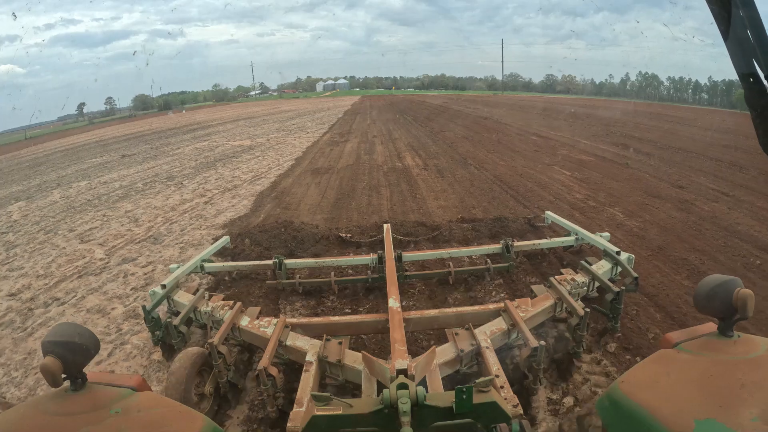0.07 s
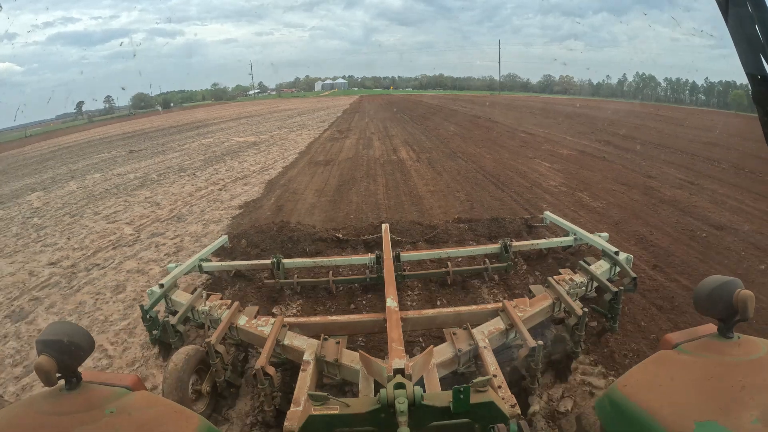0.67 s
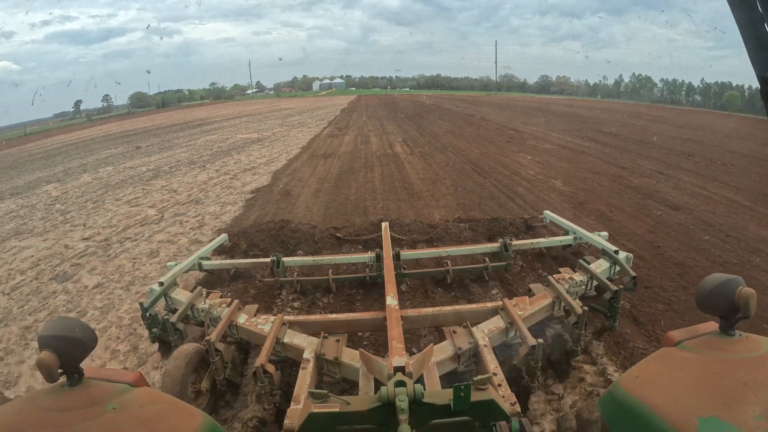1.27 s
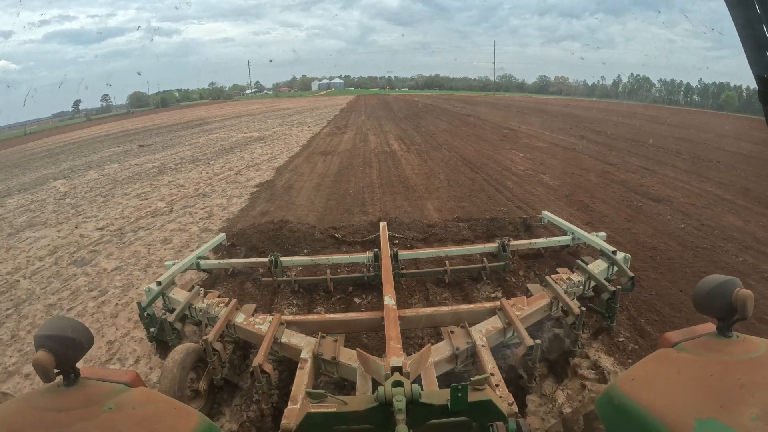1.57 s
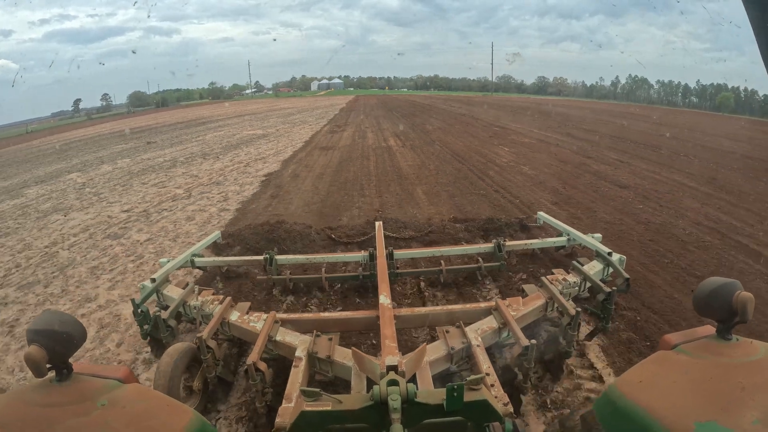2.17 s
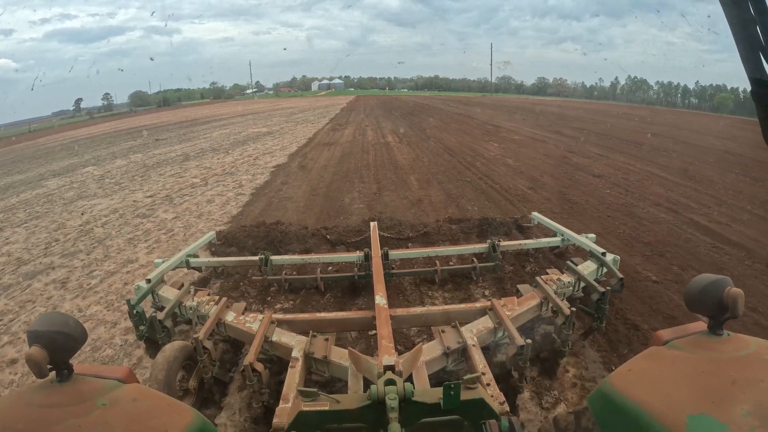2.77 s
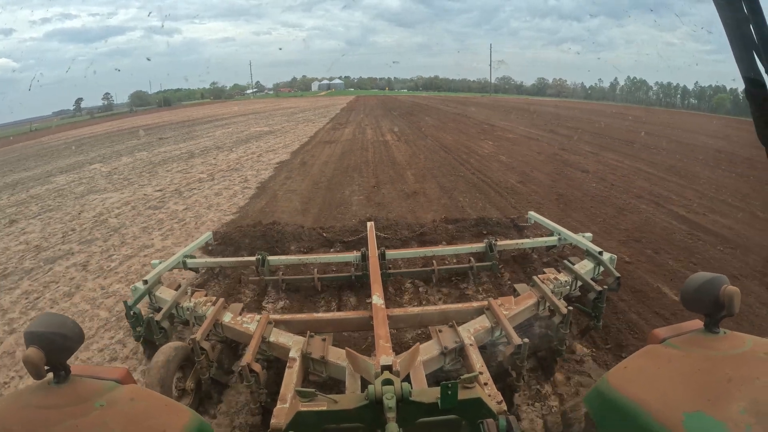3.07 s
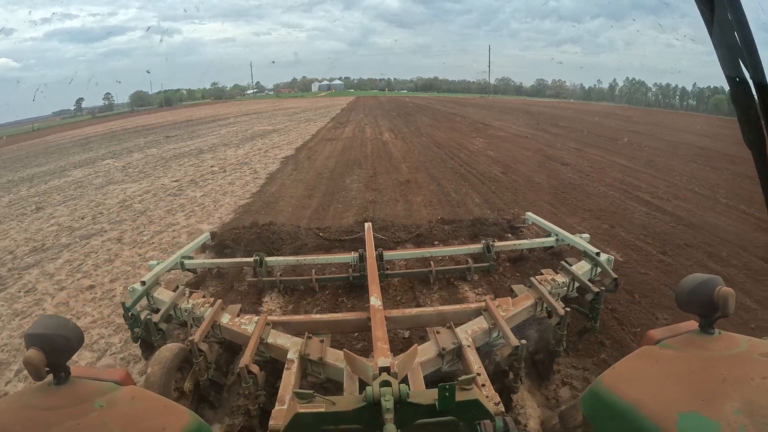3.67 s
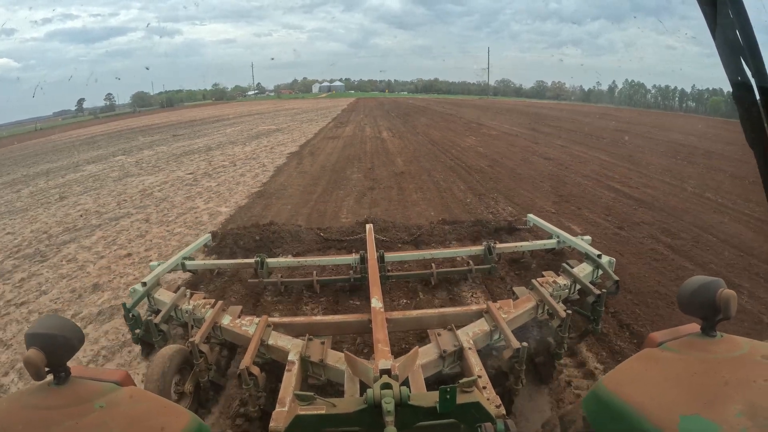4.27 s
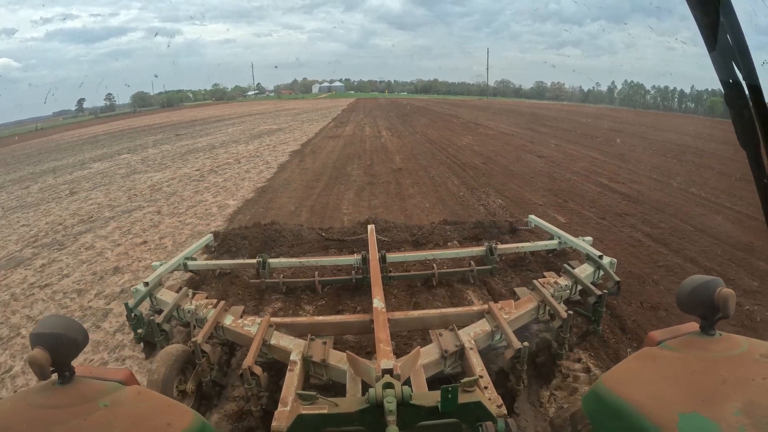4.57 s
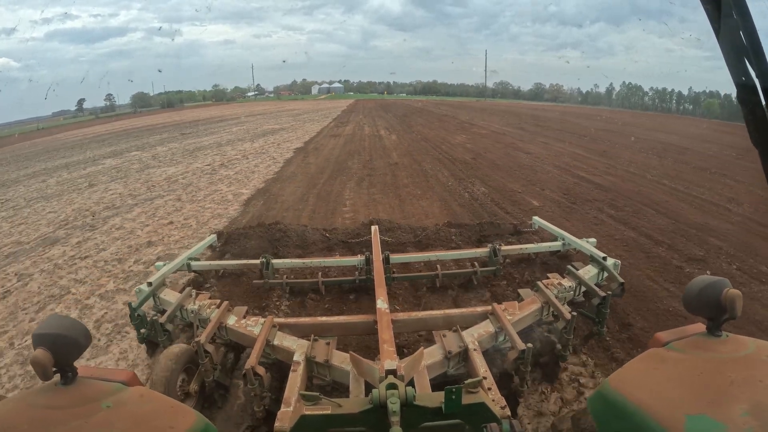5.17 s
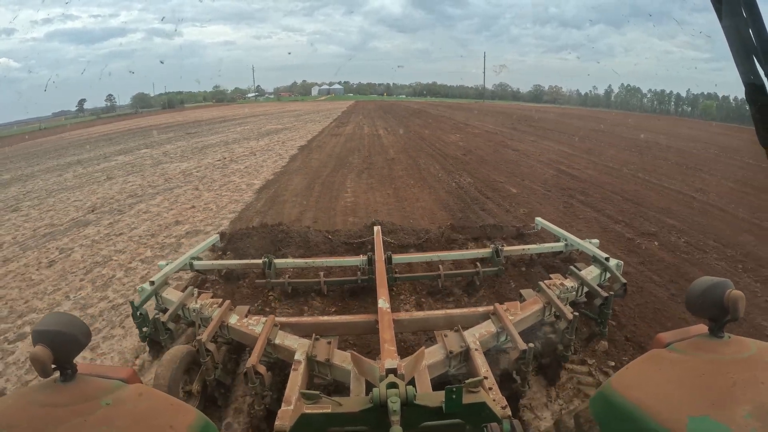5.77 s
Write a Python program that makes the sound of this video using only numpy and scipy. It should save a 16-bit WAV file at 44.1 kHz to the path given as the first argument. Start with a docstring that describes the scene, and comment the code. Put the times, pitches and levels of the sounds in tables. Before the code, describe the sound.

Inside a closed tractor cab, a laboring diesel engine hums and booms while gears whine and a ripper scrapes through soil.

```python
"""The hum, clatter and drone of a six-cylinder diesel tractor ripping a field, heard inside the closed cab.
The engine's tones and knocks follow its speed as the load bends it; the transmission drones and gears whine.
The cab booms, shakes and rattles, and the ripper's steel scrapes and squeals through hard ground.
Near the end the sound fades out for an instant and comes back a little thinner and brighter."""
import sys
import numpy as np
from scipy import signal
from scipy.fft import rfft, irfft, next_fast_len
from scipy.io import wavfile
from scipy.ndimage import uniform_filter1d

SR = 44100
rng = np.random.default_rng(int(sys.argv[2]) if len(sys.argv) > 2 else 0)


def wav_out(sig):
    """Save sig, one row per channel (or a flat mono array), as 16-bit PCM at SR to the path in sys.argv[1]."""
    wavfile.write(sys.argv[1], SR, np.round(np.clip(np.atleast_2d(sig).T, -1, 1) * 32767).astype(np.int16))


N = 265041
TIME = np.arange(N) / SR

# each cylinder's knock, in firing order: level/dB
CYLINDERS = [-2.5, 4.5, 3, 0.5, 0.5, 0.5]
# colour shared by the rush of air and the loose fittings: f/Hz, level/dB
RUSH_COLOUR = [(500, -8), (1000, -3), (1370, 0.5), (1600, -6.5), (1850, -2.5), (2060, 0), (2400, -3),
               (2700, -6.5), (3000, -10.5), (3420, -11), (3560, -10.5), (3720, -15.5), (4000, -16),
               (5500, -22.5), (7200, -25), (8100, -40), (10200, -43.5), (11200, -61), (14000, -56.5)]


def engine_hum(turns, speed, pull_db):
    """The unevenly throbbing firing note and the other low orders (multiples) of the engine cycle."""
    # the firing note swells and sinks: t/s, level/dB
    firing_levels = [(0, -31.5), (1.2, -28.5), (1.42, -24), (2.3, -25), (2.65, -30.5), (3.45, -25),
                     (4.1, -30), (4.6, -28), (5.3, -38), (5.85, -28), (5.93, -23)]
    # the next order up wells up and beats against it: t/s, half-length/s, level/dB
    beats = [(2.4, 0.64, -31), (3.25, 0.36, -32.5)]
    # the body of the hum at the usual pull: order, level/dB
    orders = [(3, -33), (4, -41.5), (5, -38.5), (7, -35), (8, -44), (9, -39), (10, -41), (11, -39.5),
              (12, -36), (13, -44), (14, -44), (15, -47), (16, -48.5), (17, -48), (18, -49.5), (20, -45.5),
              (23, -45.5), (24, -52), (27, -53), (31, -56.5), (36, -56.5), (41, -58.5), (51, -60)]
    # orders that sweep through the cab's panel resonances: order, base level/dB
    panel_orders = [(19, -46), (21, -41.5), (32, -57), (34, -58.5), (35, -55)]
    # those resonances: f/Hz, width/Hz, lift/dB
    panels = [(341, 9, 7), (381, 9, 7), (559, 16, 9), (606, 10, 8.5)]
    firing = tone(turns * len(CYLINDERS), curve(firing_levels), flutter=.31, rate=9)
    beating = swells(beats) * tone(turns * (len(CYLINDERS) + 1), 0, flutter=1, rate=3)
    body = sum(tone(turns * k, db, flutter=.2, rate=2.8) for k, db in orders)
    panel_hum = sum(tone(turns * k, db + lift_db(speed * k, panels), flutter=.22, rate=2.3)
                    for k, db in panel_orders)
    return firing + beating + amp(pull_db) * (body + panel_hum)


def knocks(turns, decay, uneven_db):
    """A pulse for each firing, decaying over a share of the interval; cylinders and strokes all differ."""
    firing, since = np.divmod(turns * len(CYLINDERS), 1)
    firing = firing.astype(int)
    cylinder_db = np.take(CYLINDERS, firing % len(CYLINDERS))
    stroke_db = uneven_db * rng.standard_normal(firing[-1] + 1)
    return unit(amp(cylinder_db + stroke_db[firing]) * np.exp(-since / decay))


def engine_clatter(knock):
    """Diesel clatter: noise pumped by the knocks, dulled by the cab's walls."""
    # low-mid colour: f/Hz, level/dB
    colour = [(120, 12.5), (250, 5.5), (380, 8.5), (440, 8.5), (515, 1), (570, -1), (640, 3), (720, -2),
              (800, -3.5), (880, -3.5), (970, -13.5), (1400, -27.5), (3000, -61.5)]
    return amp(-32) * pulsed_noise(knock, colour, depth=.51)


def engine_buzz(turns, cycle_hz, versions=3):
    """Higher orders: a few versions of one cycle's rattle that slowly trade places."""
    # base strength of each order by its pitch: f/Hz, level/dB
    colour = [(500, -61), (600, -59.5), (660, -57.5), (780, -62), (850, -62), (950, -69.5), (1300, -77),
              (1600, -77), (2500, -76)]
    size, orders = 4096, np.arange(28, 150)
    strengths = amp(colour_db(colour, orders * cycle_hz))
    buzz = np.zeros(N)
    for _ in range(versions):
        comb = np.zeros(size // 2 + 1, complex)
        comb[orders] = strengths * np.exp(2j * np.pi * rng.random(len(orders)))
        cycle = irfft(comb) * size / np.sqrt(2)
        buzz += wander(rate=.63) * np.interp(turns % 1 * size, np.arange(size), cycle)
    return buzz / np.sqrt(versions)


def drone(speed, pull_db, glide_s=.2, full_pull_db=1.2):
    """The transmission's drone slides up at two gear shifts, then comes back lower after the brief dip."""
    # the drone's pitch steps: t/s, order, level at the usual pull/dB
    steps = [(0, 9.49, -25.8), (4.28, 9.85, -23.7), (5.31, 10.3, -21.2), (5.88, 9.1, -21.7)]
    starts, orders, levels = np.transpose(steps)
    step = np.searchsorted(starts[1:], TIME)
    order, db = uniform_filter1d([orders[step], levels[step]], int(glide_s * SR) + 1)
    eased_db = .9 * np.minimum(pull_db, full_pull_db)  # it eases as the pull slackens
    return tone(np.cumsum(order * speed) / SR, db + eased_db, flutter=.045, rate=9.2)


def gear_whines(turns, speed, pull_db):
    """Whines geared to the crank: the housing lifts them; they flare and steady as the teeth load up."""
    # gears and pumps: order, base level/dB, flutter share, flutter rate/Hz, pitch waver/Hz
    whines = [(6.55, -37.5, .4, 3, .8), (24.15, -47, .4, 4, .3), (25.3, -46, .5, 5, 1),
              (32.2, -52.5, .05, 4, .1), (43, -58, .25, 6, .7), (48.3, -58, .7, 6, 1),
              (50.68, -55.5, .6, 14, 2), (69, -63, .5, 7, 1), (76, -66, .45, 7, 1),
              (101.2, -60, .4, 12, 2.5), (114, -63.5, .7, 45, 2), (151.8, -65, .7, 14, 6),
              (154.5, -72, .6, 30, 6)]
    # brief flares: t/s, half-length/s, order of the whine, level/dB
    flares = [(.85, .2, 32.2, -51), (1.55, .13, 32.2, -46.5), (3.85, .15, 32.2, -49), (2.27, .05, 43, -49),
              (2.9, .25, 43, -60), (3.62, .1, 43, -49.5), (.04, .04, 50.68, -46), (.86, .07, 50.68, -46.5),
              (1.06, .08, 50.68, -49), (1.42, .05, 50.68, -51), (1.76, .04, 50.68, -49),
              (1.88, .035, 50.68, -49), (2.01, .045, 50.68, -47), (3.8, .06, 50.68, -50),
              (4.95, .3, 50.68, -51), (5.21, .045, 50.68, -50), (5.77, .05, 50.68, -49),
              (.95, .15, 69, -61), (3.57, .08, 69, -62), (5.73, .17, 69, -55), (.2, .35, 76, -58),
              (.7, .05, 76, -58), (5.2, .17, 76, -56), (1.8, .05, 101.2, -58), (2.01, .05, 101.2, -56),
              (3.25, .25, 101.2, -62), (5.78, .03, 101.2, -55), (.15, .22, 114, -54.5),
              (.54, .12, 114, -54.5), (.88, .07, 114, -55), (1.2, .13, 114, -54.5), (1.9, .28, 114, -55),
              (3.25, .2, 114, -61), (3.87, .09, 114, -51.5), (4.08, .12, 114, -55.5),
              (4.35, .13, 114, -51.5), (5.62, .07, 114, -54.5), (5.17, .07, 154.5, -54)]
    # the gear housing's resonances: f/Hz, width/Hz, lift/dB
    housing = [(569, 14, 10.5), (778, 14, 11.5), (881, 10, 5), (904, 5, 2.5), (2016, 50, 7)]
    mix = np.zeros(N)
    for order, db, flutter, rate, waver_hz in whines:
        steady = amp(db + .19 * pull_db + lift_db(speed * order, housing))
        level = steady + swells((t, length, peak_db) for t, length, k, peak_db in flares if k == order)
        slip = np.cumsum(waver_hz * wander(rate)) / SR
        mix += level * tone(turns * order + slip, 0, flutter * np.sqrt(steady / level), rate)
    return mix


def cab_boom(pull_db, lug):
    """The cab's low boom swells slowly and grows as the engine lugs."""
    # bass-heavy colour: f/Hz, level/dB
    colour = [(5, -24.5), (14, -9.5), (22, 3), (32, -2.5), (45, -4.5), (75, -9.5), (90, -3.5), (108, -2),
              (130, -2.5), (150, -3.5), (190, -11), (240, -5), (258, -11.5), (280, -11), (315, -20),
              (450, -33.5), (900, -84.5)]
    db = -27 + .23 * pull_db + 7 * lug + wander(rate=4.2)
    return amp(db) * coloured(rng.standard_normal(N), colour)


def cab_shake(hz):
    """The cab rocks on its mounts as the tyre lugs meet the ground."""
    # rough ground rocks it harder: t/s, half-length/s, level/dB
    bumps = [(.14, 0.048, -19.5), (.98, 0.07, -17.5), (2.38, 0.48, -22), (3.8, 0.074, -22.5),
             (4.3, 0.098, -29.5), (5.1, 0.084, -24), (5.6, 0.22, -22.5)]
    rocking = tone(hz * TIME + .15 * wander(rate=3.1), 0, flutter=.14, rate=4)
    return (amp(-24) + swells(bumps)) * rocking


def air_rush(knock, pull_db):
    """A rush of air that grows with the pull and barely pulses with the firing."""
    return amp(-46.5 + .6 * pull_db) * pulsed_noise(knock, RUSH_COLOUR, depth=.044)


def rasp(knock):
    """A narrow band of treble that pulses with the firing, sinks midway and returns."""
    # its fader ride: t/s, level/dB
    levels = [(0, -57.5), (.8, -59.5), (1.5, -63.5), (2.4, -66), (3.1, -57), (3.7, -55.5), (3.9, -60),
              (4.7, -55.5), (5.5, -58), (5.85, -57)]
    # its colour: f/Hz, level/dB
    colour = [(2000, -41), (2450, -7), (2700, 0.5), (2900, -5.5), (3300, -19.5), (4200, -46.5)]
    return amp(curve(levels)) * pulsed_noise(knock, colour, depth=.27)


def ripper_scrapes():
    """Gritty bursts as the ripper's steel scrapes through hard ground."""
    # each scrape: t/s, half-length/s, level/dB
    scrapes = [(.06, .015, -56), (.14, .035, -57), (.35, .012, -61), (.64, .04, -58), (1.03, .01, -59),
               (1.075, .014, -54), (1.85, .1, -63), (2.1, .015, -62), (4.71, .025, -58),
               (4.765, .014, -55.5), (5.01, 0.054, -60)]
    # steely colour: f/Hz, level/dB
    colour = [(1500, -27), (2400, -6), (2750, 7.5), (3300, -4.5), (3800, -7.5), (4400, -1), (4850, -3),
              (5500, -12), (7200, -21.5), (8200, -47)]
    return swells(scrapes) * coloured(grains(per_s=440, spread_db=2.5, decay_s=.003), colour)


def ripper_squeals():
    """Steel rubs on steel in short, rough squeals, each on its own pitch."""
    # each squeal: t/s, half-length/s, f/Hz, level/dB
    squeals = [(.95, .022, 2540, -51), (1.075, .018, 2600, -56), (2.08, .025, 2320, -57),
               (3.15, 0.016, 2780, -55), (5.06, .04, 3010, -58)]
    return sum(swells([(t, length, db)]) * tone(hz * TIME, 0, flutter=.6, rate=70)
               for t, length, hz, db in squeals)


def cab_rattle(pull_db):
    """Loose cab fittings tick lightly, louder under a harder pull."""
    ticks = grains(per_s=37, spread_db=1, decay_s=.013)
    return amp(-60.5 + pull_db) * coloured(ticks, RUSH_COLOUR)


def ping(at_s, hz, rise_s=.012, t60_s=.2):
    """One small metal part is knocked and rings briefly."""
    since = np.maximum(TIME - at_s, 0)
    attack = np.minimum(since / rise_s, 1)
    return attack * tone(hz * TIME, -68 - 60 * since / t60_s, flutter=.3, rate=60)


def joint_squeaks(hz, half_length_s):
    """A dry joint gives faint, rough chirps on one pitch."""
    # each squeak: t/s, level/dB
    squeaks = [(1.39, -77), (1.54, -83), (1.63, -85), (1.71, -81), (1.81, -83), (1.94, -72), (1.99, -82),
               (2.38, -79), (2.46, -81), (2.54, -85), (2.91, -80), (3.18, -81), (3.24, -78)]
    # fainter chirring in between: t/s, half-length/s, level/dB
    chirring = [(1.75, .4, -89), (2.5, .2, -89), (3.1, 0.17, -90)]
    chirps = swells((t, half_length_s, db) for t, db in squeaks)
    return np.hypot(chirps, swells(chirring)) * tone(hz * TIME, 0, flutter=2.5, rate=150)


def turbo(lug, lag_s):
    """The turbocharger's very faint blade whistle spins up a moment after the engine lugs."""
    # the whistle flares: t/s, half-length/s, level/dB
    flares = [(.37, .1, -95), (1, .35, -97), (1.8, .05, -87), (2.12, .13, -94), (3.15, .12, -90.5),
              (3.72, .04, -92), (4.75, .1, -92.5), (5.68, .11, -95)]
    hz = 13200 + 450 * np.interp(TIME - lag_s, TIME, lug)
    return (amp(-96) + swells(flares)) * tone(np.cumsum(hz) / SR, 0, flutter=.9, rate=60)


def amp(db):
    """Decibels to gain."""
    return 10 ** (np.asarray(db) / 20)


def unit(x):
    """Scales to an rms of one."""
    return x / np.sqrt(np.mean(x ** 2) + 1e-20)


def curve(points):
    """An automation line through (t/s, value) points."""
    return np.interp(TIME, *np.transpose(points))


def swells(rows):
    """A smooth rise and fall of gain for each (t/s, half-length/s, level/dB) row."""
    return sum(amp(db) * np.exp(-((TIME - t) / length) ** 2) for t, length, db in rows)


def colour_db(colour, hz):
    """A colour's level at a pitch, on a log-frequency axis."""
    f, db = np.transpose(colour)
    return np.interp(np.log(hz + 1), np.log(f), db)


def lift_db(hz, resonances):
    """How much a set of resonances lifts a tone of this pitch."""
    return sum(lift / (1 + (2 * (hz - centre) / width) ** 2) for centre, width, lift in resonances)


def equalise(x, colour):
    """Applies a colour as an EQ curve."""
    size = next_fast_len(N)
    gain = amp(colour_db(colour, np.fft.rfftfreq(size, 1 / SR)))
    return irfft(rfft(x, size) * gain, size)[..., :N]


def coloured(x, colour):
    """Gives a sound a colour, at unit rms."""
    return unit(equalise(x, colour))


def wander(rate):
    """Smooth random drift of unit rms, changing up to about rate times a second."""
    size = 2048
    hz = np.fft.rfftfreq(size, TIME[-1] / size)
    slow = irfft(rfft(rng.standard_normal(size)) / (1 + (hz / rate) ** 2))
    return np.interp(TIME, np.linspace(0, TIME[-1], size), unit(slow))


def tone(turns, db, flutter, rate):
    """A tone at db rms that follows a rotation, unsteady in strength and phase."""
    angle = 2 * np.pi * (turns + rng.random())
    line = (1 + flutter * wander(rate)) * np.cos(angle) + flutter * wander(rate) * np.sin(angle)
    return amp(db) * line * np.sqrt(2 / (1 + 2 * flutter ** 2))


def pulsed_noise(knock, colour, depth):
    """Coloured noise that swells with the knocks."""
    return coloured((1 - depth + depth * knock) * rng.standard_normal(N), colour)


def grains(per_s, spread_db, decay_s):
    """Randomly timed ticks of noise, uneven in size, each dying away."""
    sizes = amp(spread_db * np.minimum(rng.exponential(1, N), 3))
    hits = sizes * (rng.random(N) < per_s / SR)
    envelope = signal.lfilter([1], [1, -np.exp(-1 / (decay_s * SR))], hits)
    return envelope * rng.standard_normal(N)


def scene():
    """Engine, driveline, cab and ripper, mixed in mono at one point in the cab."""
    # engine speed: t/s, four-stroke cycle rate/Hz
    speeds = [(0, 17.73), (.4, 17.63), (1.1, 17.86), (1.7, 17.83), (2.1, 17.92), (2.75, 18.15),
              (3.25, 17.89), (3.6, 17.9), (3.9, 17.77), (4.3, 17.69), (4.8, 17.4), (5.1, 17.37),
              (5.4, 17.45), (5.7, 17.81), (6, 18.3)]
    # how hard the ripper drags: t/s, level above the usual pull/dB
    pulls = [(0, 5.5), (.08, 2.5), (.3, 0.5), (.6, 1.1), (.92, 1.2), (1.2, -.5), (1.7, 1.5), (2.1, 0.5),
             (2.5, -3.5), (3, -1), (3.7, 1.3), (3.95, 0.6), (4.8, 1.3), (5.4, -0.8), (5.85, -1)]
    speed, pull_db = curve(speeds), curve(pulls)
    turns = np.cumsum(speed) / SR
    lug = 17.8 - speed  # Hz below the cycle rate at the usual pull
    clatter_gain = amp(.88 * pull_db + .29 * wander(rate=6.7))
    knock = knocks(turns, decay=.53, uneven_db=1.5)
    engine = clatter_gain * (engine_clatter(knock) + engine_buzz(turns, speed.mean()))
    engine += engine_hum(turns, speed, pull_db)
    engine += air_rush(knock, pull_db) + rasp(knock) + turbo(lug, lag_s=.2)
    driveline = drone(speed, pull_db) + gear_whines(turns, speed, pull_db)
    cab = cab_boom(pull_db, lug) + cab_shake(hz=15.8)
    cab += cab_rattle(pull_db) + joint_squeaks(hz=8400, half_length_s=.012)
    ripper = ripper_scrapes() + ripper_squeals() + ping(at_s=2.6, hz=5950)
    return (engine + driveline + cab + ripper)[None]


def record(dry):
    """The sound dips for an instant and returns thinner and brighter; the very top is cut throughout."""
    # EQ after the dip: f/Hz, gain/dB
    late_colour = [(20, -6), (110, 2), (170, -3), (220, -13), (300, -2), (350, -2), (450, -2), (540, 13.5),
                   (620, -2), (800, 0), (1150, 4.5), (2000, 2), (7000, 1)]
    dip_s, fade_out_s, fade_in_s, floor_db = 5.882, .034, .033, -52
    sound = np.where(TIME < dip_s, dry, equalise(dry, late_colour))
    fader = np.maximum((dip_s - TIME) / fade_out_s, (TIME - dip_s) / fade_in_s)
    gain = amp(floor_db) + np.minimum(fader, 1) ** 2.05
    soft_ends = signal.windows.tukey(N, .001)
    high_cut = signal.firwin(511, cutoff=14000, window=("kaiser", 9), fs=SR)
    return signal.oaconvolve(sound * gain * soft_ends, high_cut[None], "same")


dry = scene()
out = record(dry)
wav_out(out)
```